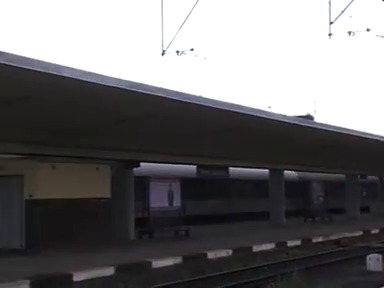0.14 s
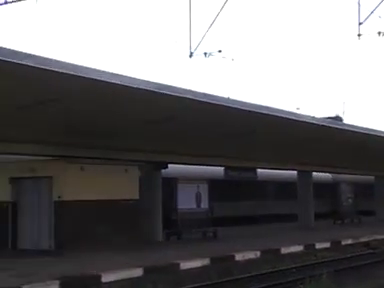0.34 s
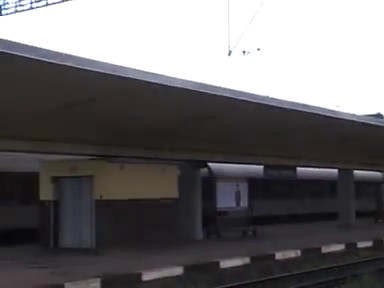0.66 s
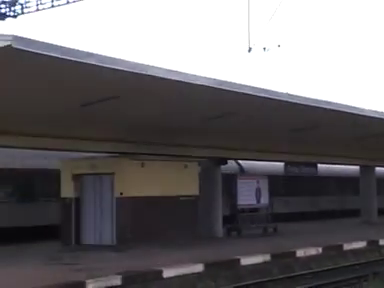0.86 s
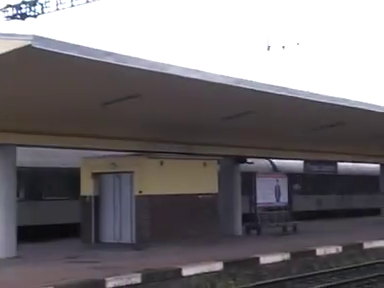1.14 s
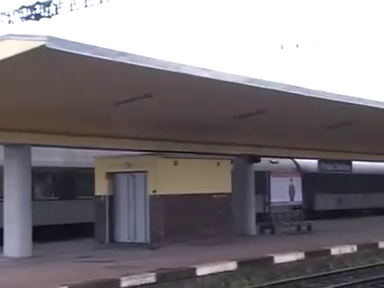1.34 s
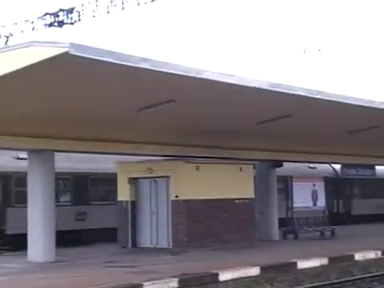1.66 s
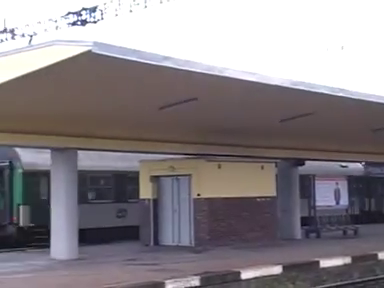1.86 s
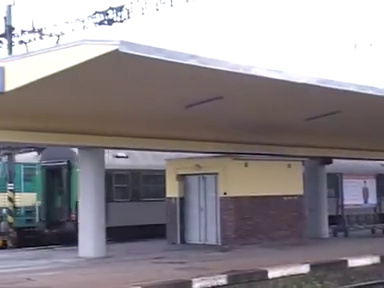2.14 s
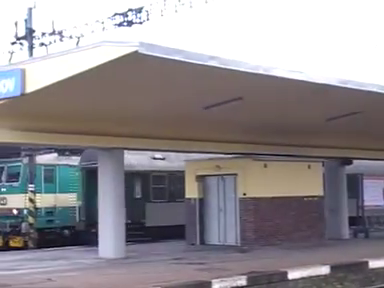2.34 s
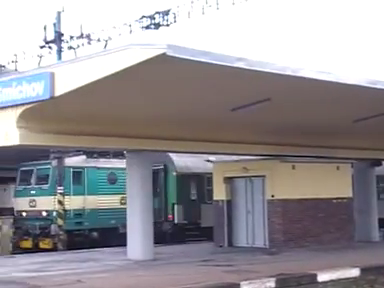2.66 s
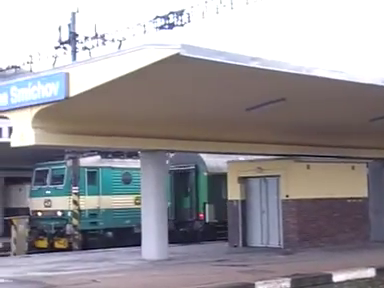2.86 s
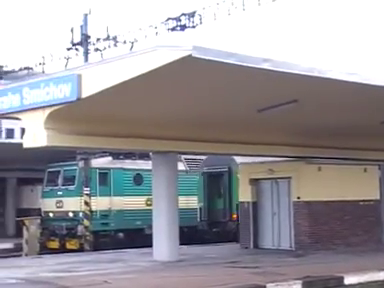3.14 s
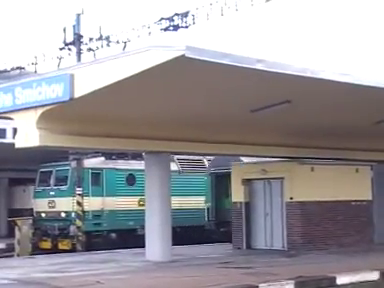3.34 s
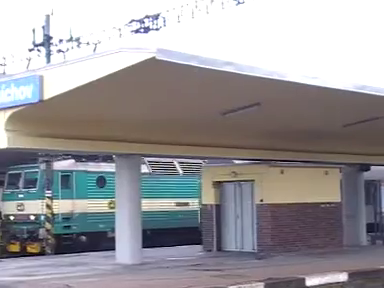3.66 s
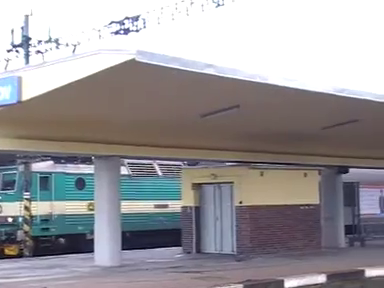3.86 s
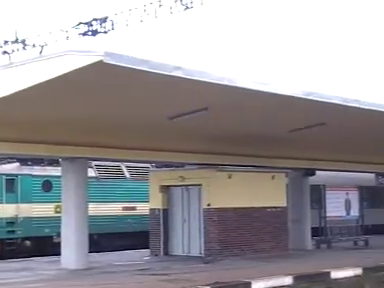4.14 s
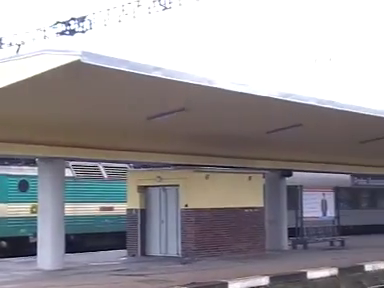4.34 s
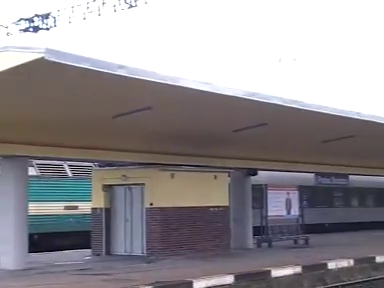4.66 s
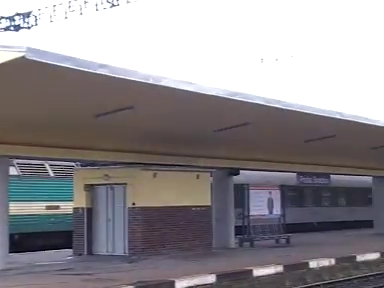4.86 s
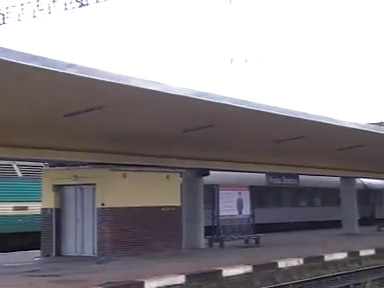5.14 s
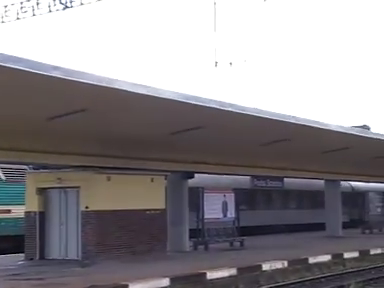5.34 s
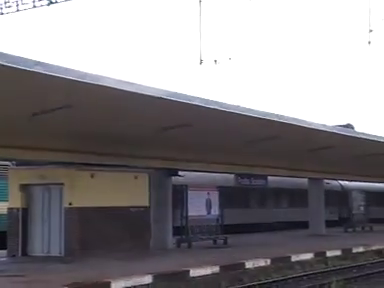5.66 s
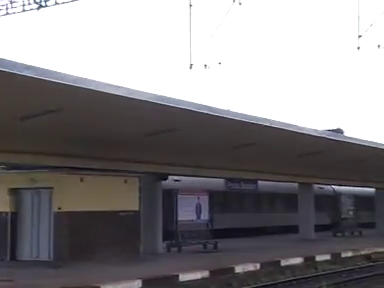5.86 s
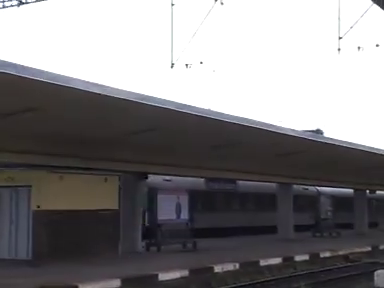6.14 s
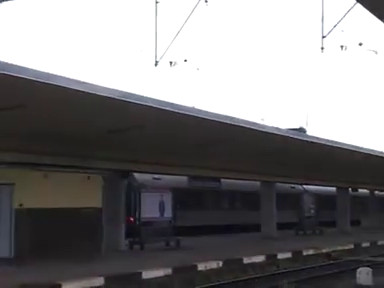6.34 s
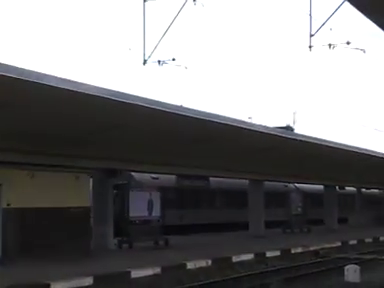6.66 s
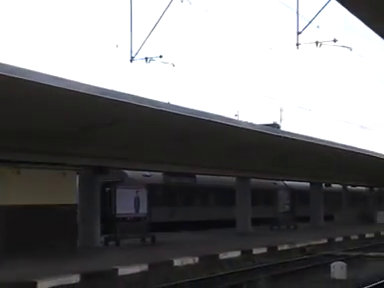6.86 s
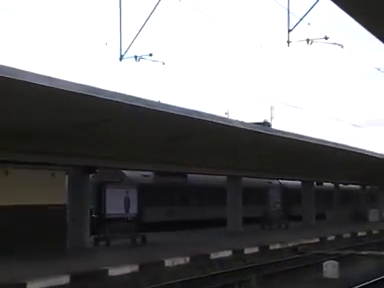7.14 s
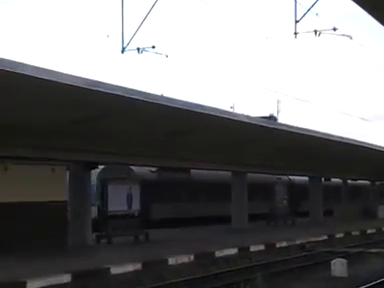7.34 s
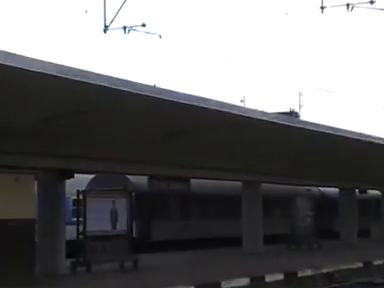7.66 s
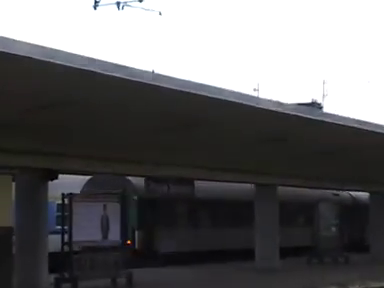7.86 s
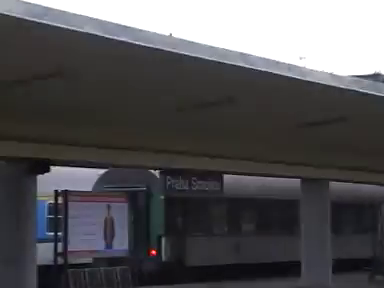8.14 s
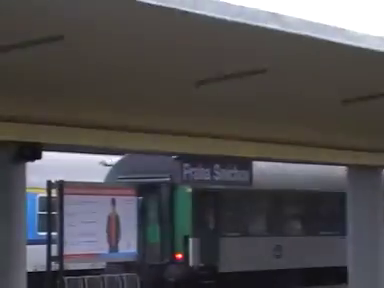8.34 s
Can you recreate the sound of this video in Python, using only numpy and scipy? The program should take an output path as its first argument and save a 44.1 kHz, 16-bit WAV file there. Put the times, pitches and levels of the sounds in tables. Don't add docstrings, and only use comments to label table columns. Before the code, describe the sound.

Brakes shriek on slowing train wheels, heard from a platform some distance away. Thin metallic whistling tones tremble, cut and return over a muffled rolling roar, while dull thuds and loose knocks come mostly in the first half. The rumble weakens, the highest squeal drops away, and two lower steady whines take over, dip together briefly and continue faintly, with hiss around them. A faint locomotive fan hum stays underneath.

```python
import sys
import numpy as np
from scipy import signal
from scipy.fft import rfft, irfft, next_fast_len
from scipy.io import wavfile
from scipy.ndimage import uniform_filter1d, minimum_filter1d

SR = 44100
rng = np.random.default_rng(int(sys.argv[2]) if len(sys.argv) > 2 else 0)


def ratio_of_db(decibels):
    return 10 ** (np.asarray(decibels, float) / 20)


def master_out(mix):
    frames = np.transpose(np.atleast_2d(mix))
    ceiling = np.clip(frames, -1, 1)
    pcm = np.round(ceiling * 32767).astype(np.int16)
    wavfile.write(sys.argv[1], SR, pcm)


N = 374403
T = np.arange(N) / SR
STEREO = np.array([[1], [-1]])


def unit(x):
    return x / np.sqrt(np.mean(np.abs(x) ** 2))


def curve(rows, col=1):
    rows = np.array(rows)
    return np.interp(T, rows[:, 0], rows[:, col])


def walk(rate_hz):
    hold = int(SR / rate_hz)
    steps = np.repeat(rng.standard_normal(N // hold + 1), hold)
    return unit(uniform_filter1d(uniform_filter1d(steps, hold), hold)[:N])


def slips(rows):
    return sum(db * np.clip(1 - np.abs(T - s) / half_s, 0, 1) for s, db, half_s in rows)


def bites(rows):
    power = 0
    for s, peak_db, rise, fall in rows:
        drop_db = np.where(T < s, rise * (s - T), fall * (T - s))
        power = power + ratio_of_db(peak_db - drop_db) ** 2
    return np.sqrt(power)


def flutter(width_hz, steep, edge_db=0.):
    hop = 8
    size = next_fast_len(N // hop + 2)
    f = np.fft.fftfreq(size, hop / SR)
    z = rng.standard_normal(size) + 1j * rng.standard_normal(size)
    z = z * (1 + (f / width_hz) ** 2) ** (-steep / 2)
    z = z * ratio_of_db(edge_db * np.clip(-f / width_hz - .4, 0, .2) * 3.1)
    return unit(signal.resample(np.fft.ifft(z), size * hop)[:N])


def band_noise(noise, low_hz, high_hz, order):
    sos = signal.butter(order, [low_hz, high_hz], "band", fs=SR, output="sos")
    return unit(signal.sosfilt(sos, noise))


# centre in Hz, width in Hz, level in dB.
FAN_HUMS = [
    (258, 2.7, -47),
    (1001, 86, -45.5),
    (646, 25, -50.5),
]


def fans():
    return sum(ratio_of_db(db) * np.real(flutter(width_hz, 2.8) * np.exp(2j * np.pi * hz * T))
               for hz, width_hz, db in FAN_HUMS)


# time in seconds, level in dB.
ROLL_LEVEL = [(0, -27), (.4, -30.5), (1.1, -34), (1.6, -33), (2.0, -37.5), (2.5, -33.5), (3.2, -33),
              (3.7, -33), (3.85, -34.5), (4.3, -36), (4.55, -41), (5.1, -36.5), (5.42, -39), (6.0, -38),
              (6.7, -34.5), (7.37, -40), (7.66, -36), (8.49, -35.5)]
# frequency in Hz, density in dB per Hz.
ROLL_SPECTRUM = [(25, -26), (50, -9), (100, 0.5), (210, -0.5), (320, -7), (420, -6), (800, -3.5),
                 (1500, -6), (2500, -8.5), (3600, -16.5), (5500, -19), (8000, -18), (10200, -18),
                 (11000, -33.5), (11500, -55)]
# frequency in Hz, side minus mid in dB.
ROLL_WIDTH = [(60, -15), (110, -24), (190, -18.5), (350, -16), (620, -16.5), (1120, -14), (2010, -13.5),
              (3610, -11), (6490, -10.5), (11600, -1.5)]
# time in seconds, change in dB.
BLOCK_DRAG = [(0, 4.5), (.95, 9), (1.2, 1.5), (2.0, -1), (4.4, -2.5), (5.45, 3.5), (6.3, 0.5), (8.49, -4)]
# time in seconds, rise in dB.
JOLTS = [(0.153, 3.5), (.6, 1.5), (.95, 3.5), (1.3, 0), (2.139, 4), (2.3, 1.5), (2.62, 4), (3.2, 1.5),
         (3.45, .5), (3.622, 3), (3.78, 2.5), (4.46, 2), (4.67, 4.5), (5.06, .3), (5.88, 4.5), (6.2, 1.5),
         (6.5, 3), (6.991, 1.5), (7.21, 3)]
# share of rolling level, of jolts, of drag, drift in dB/s.
PART_RESPONSE = [
    (1.1, 0.78, 0.041, 0.3),
    (0.97, 1.04, .02, -0.03),
    (0.87, 1.2, 0.81, -0.5),
    (0.69, 1.5, 1, 0.1),
    (0.62, 1.65, 0.47, -1.5),
]


def rolling():
    f = np.fft.rfftfreq(N, 1 / SR) + 1
    spectrum, width = np.array(ROLL_SPECTRUM), np.array(ROLL_WIDTH)
    tilt = ratio_of_db(np.interp(np.log(f), np.log(spectrum[:, 0]), spectrum[:, 1]))
    jolt_db = slips([(s, db, 0.051) for s, db in JOLTS])
    level_db = curve(ROLL_LEVEL)
    controls = np.array([level_db - level_db.mean(), jolt_db, curve(BLOCK_DRAG), T - T.mean()])
    part_db = np.array(PART_RESPONSE) @ controls
    handover = np.log([250, 600, 2000, 4000, 6500, 9000])
    parts = np.eye(5)[[0, 1, 1, 2, 3, 4]].T
    shared = walk(11)
    out = 0
    for hz in 25 * 2 ** np.arange(0, 9.1, .5):
        shape = tilt * np.cos(np.pi * np.clip(np.log2(f / hz), -.5, .5))
        mid, side = irfft(rfft(rng.standard_normal((2, N))) * shape, N)
        share = np.array([np.interp(np.log(hz), handover, part) for part in parts])
        db = share @ part_db
        db = db + (0.38 + 0.49 * share[2]) * shared + 1.0 * walk(6)
        side_db = np.interp(np.log(hz), np.log(width[:, 0]), width[:, 1]) + 1.5
        lean_db = np.interp(np.log2(hz), [7, 10, 12], [-.3, .6, .1])
        out = out + ratio_of_db(db + STEREO * lean_db) * (mid + STEREO * ratio_of_db(side_db) * side)
    return ratio_of_db(-30.5) * unit(out)


# time in seconds, thud in dB.
JOINT_THUDS = [(.15, -20), (.95, -23), (2.15, -21), (2.62, -20.5), (3.179, -24), (2.8, -25), (3.45, -30),
               (3.62, -24), (3.77, -24), (4.03, -27), (4.3, -32), (5.8, -35), (6.5, -40), (7.83, -27),
               (8.08, -30)]


def joints():
    thud = band_noise(rng.standard_normal(N), 100, 210, 3)
    out = np.zeros(N)
    for s, thud_db in JOINT_THUDS:
        age = np.maximum(T - s + 0.019, 0)
        out += ratio_of_db(thud_db) * (1 - np.exp(-age / 0.036)) * np.exp(-age / 0.037) * thud
    return out


# time in seconds, level in dB.
COUPLING_KNOCKS = [(.245, -32), (2.15, -34), (2.69, -31.5), (3.16, -30.5), (3.785, -33), (6.26, -39),
                   (6.79, -38)]


def knocks():
    hollow = band_noise(rng.standard_normal(N), 560, 900, 2)
    gain = 0
    for s, db in COUPLING_KNOCKS:
        decay_s = np.where(T < s, .008, .035)
        gain = gain + ratio_of_db(db) * (T > s - .02) * np.exp(-np.abs(T - s) / decay_s)
    return gain * hollow


# time in seconds, level in dB, centre in Hz, length in seconds.
GRIT_TICKS = [(0.928, -40, 11500, .014), (2.43, -24, 9800, .004), (2.8, -49.5, 11400, .01),
              (3.2, -36, 9800, .008), (4.1, -39, 9650, .008), (4.475, -43, 11600, .014),
              (5.7, -48, 11400, .01)]


def ticks():
    grit = rng.standard_normal((2, N))
    return sum(ratio_of_db(db) * np.exp(-((T - s) / length_s) ** 2) * band_noise(grit, hz * .97, hz * 1.03, 2)
               for s, db, hz, length_s in GRIT_TICKS)


def ring(mode, rows, steady, steep, side_db, lag, wobble_db=0., gain_db=0., edge_db=0.):
    from_s, to_s, start_hz, end_hz, width_hz = mode
    hz = np.interp(T, [from_s, to_s], [start_hz, end_hz])
    fade_in = T - from_s + (from_s <= 0)
    fade_out = to_s - T + (to_s > T[-1] - .02)
    fade = np.clip(np.minimum(fade_in, fade_out) / 0.14, 0, 1)
    steady = np.clip(steady, 0, 1)
    mid = steady + np.sqrt(1 - steady ** 2) * flutter(width_hz, steep, edge_db)
    side = ratio_of_db(side_db) * flutter(width_hz, steep, edge_db)
    phase = 2 * np.pi * np.cumsum(hz) / SR + STEREO * lag * walk(2.475)
    level = bites(rows) * ratio_of_db(gain_db + wobble_db * walk(9)) * fade
    return np.sqrt(2) * level * np.real(np.exp(1j * phase) * (mid + STEREO * side))


# from s, to s, start in Hz, end in Hz, width in Hz.
FAINT_LOW_MODES = [(5.6, 8.2, 4885, 4880, 40), (4.1, 6.4, 4550, 4570, 50), (0, 3.6, 6185, 6150, 40),
                   (5.1, 7.1, 6170, 6170, 55), (7, 8.49, 6110, 6130, 30), (.1, 1.6, 3278, 3270, 22),
                   (0, 1.2, 3822, 3812, 26), (5.1, 5.9, 3350, 3340, 35), (5.9, 7.05, 5670, 5665, 40),
                   (7.5, 8.49, 5300, 5300, 40), (6.3, 7.1, 4070, 4070, 30), (4, 4.45, 4765, 4760, 25)]
# peak in seconds, peak in dB, rise in dB/s, fall in dB/s.
FAINT_LOW_BITES = [
    [(5.85, -39, 160, 87), (6.45, -35.5, 30, 14), (7.15, -44, 8, 17)],
    [(4.3, -48, 40, 60), (4.79, -41, 72, 32.8), (5.45, -36.5, 25.3, 21.8)],
    [(.15, -35.5, 2.5, 19), (.75, -42, 45, 7.3), (1.19, -42, 10, 11), (2.95, -49, 5.3, 13)],
    [(5.85, -42, 15, 50), (6.45, -47, 3.5, 28)],
    [(7.23, -53, 59.7, 21), (7.77, -41.5, 26, 9.7)],
    [(.1, -39, 9.8, 15), (.47, -40, 100, 16), (.82, -29.5, 72, 55), (.97, -34, 39, 72), (1.22, -42, 20, 30)],
    [(0, -36, 11, 29), (.58, -39, 150, 20)],
    [(5.45, -44, 35, 32.6)],
    [(6.2, -42.5, 80, 18), (6.9, -47, 19, 60)],
    [(7.671, -44, 150, 27)],
    [(6.95, -53.5, 6, 80)],
    [(4.3, -44, 40, 90)],
]
# from s, to s, start in Hz, end in Hz, width in Hz.
FAINT_HIGH_MODES = [(0, 6.2, 8790, 8760, 50), (1.5, 4.6, 7750, 7745, 60), (5.3, 7.2, 10120, 10110, 110),
                    (.7, 3.3, 10900, 10890, 110), (7.1, 8.49, 11950, 11950, 110),
                    (5.38, 5.55, 11950, 11950, 110), (.4, 1.15, 8050, 8050, 70)]
# peak in seconds, peak in dB, rise in dB/s, fall in dB/s.
FAINT_HIGH_BITES = [
    [(.6, -50, 3, 2.7), (2.1, -34, 55, 40), (3.1, -35, 25, 40), (3.7, -36.5, 20, 15), (4.63, -38, 32, 40),
     (5.2, -39, 15, 17)],
    [(4.3, -52, 2, 12)],
    [(5.7, -44, 14, 5), (6.18, -35, 120, 12), (6.6, -37.5, 13, 11)],
    [(.91, -46, 70, 138), (1.77, -40.5, 37, 120), (2.85, -40, 62, 73)],
    [(7.6, -49.5, 2.9, 1.1)],
    [(5.46, -41.5, 225, 181)],
    [(.65, -42, 60, 5.4), (.95, -35, 25, 98)],
]


def faint_wheels():
    modes = zip(FAINT_LOW_MODES + FAINT_HIGH_MODES, FAINT_LOW_BITES + FAINT_HIGH_BITES)
    return sum(ring(mode, rows, steady=0.33, steep=1.65, side_db=-8.5, lag=0.098, wobble_db=1.5)
               for mode, rows in modes)


# from s, to s, start in Hz, end in Hz, width in Hz.
HALO_MODES = [(4.3, 8.49, 8080, 8115, 93), (5, 8.49, 7085, 7095, 75), (0, 3.35, 4790, 4815, 88),
              (3.15, 5.4, 4875, 4900, 70)]
# peak in seconds, peak in dB, rise in dB/s, fall in dB/s.
HALO_BITES = [
    [(4.45, -48, 100, 60), (4.9, -42.5, 65, 60), (5.3, -41, 15, 1.5), (6.34, -25.5, 27, 22),
     (6.81, -25.5, 36, 6.6), (7.7, -26.5, 12, 14)],
    [(5.0, -49, 11, 34), (6.27, -38, 21, 18), (7.0, -38, 28, 5), (7.67, -28, 17, 6.2)],
    [(.55, -25, 1.5, 32), (.95, -26, 23, 29), (1.49, -36.5, 9.7, 51), (2.63, -38.5, 26, 39),
     (2.88, -41.5, 60, 48), (3.15, -41.5, 12, 18)],
    [(3.35, -40.5, 40, 27), (3.58, -39, 30, 130), (4.66, -46, 60, 10), (5.05, -46, 20, 40)],
]
HALO_GAINS = [4.7, 4.4, 3.5, 1.4]


def halo_wheels():
    return [ring(mode, rows, steady=0, steep=1.91, side_db=-9.0, lag=0.17, wobble_db=2.5,
                 gain_db=db, edge_db=-1.5)
            for mode, rows, db in zip(HALO_MODES, HALO_BITES, HALO_GAINS)]


# from s, to s, start in Hz, end in Hz, width in Hz.
LOCKED_MODES = [(4.7, 8.49, 8044, 8067, 5), (5.8, 8.45, 8200, 8220, 8.9), (4.4, 8.49, 7044, 7053, 7.7),
                (5.7, 8.49, 7140, 7142, 10), (0, 1.9, 4752, 4765, 12)]
# peak in seconds, peak in dB, rise in dB/s, fall in dB/s.
LOCKED_BITES = [
    [(5.45, -31, 105, 98), (6.28, -22, 11, 30), (7.04, -9.5, 24, 14.5), (7.86, -8, 402, 174)],
    [(6.35, -39, 22, 3), (8.01, -30, 24, 8)],
    [(4.67, -53.5, 6, 8), (5.11, -46, 100, 102), (5.35, -49, 41, 7), (5.85, -37, 17, 28),
     (6.25, -30.5, 96, 6), (7.27, -19.5, 57, 11), (7.86, -21, 13.5, 32), (8.49, -36, 15, 11)],
    [(6.75, -55, 150, 48), (7.88, -41, 25, 9)],
    [(0, -33.5, 11, 71), (.35, -21, 37, 32), (.72, -23, 19, 122), (.97, -20.5, 145, 147),
     (1.39, -32, 41, 187), (1.59, -40, 73, 55)],
]


def locked_wheels():
    return [ring(mode, rows, steady=0.92, steep=1.45, side_db=-18, lag=0.17, wobble_db=1.8)
            for mode, rows in zip(LOCKED_MODES, LOCKED_BITES)]


# time in seconds, change in dB, half length in seconds.
FIRST_WHEEL_SLIPS = [(4.72, -15, 0.088), (4.87, -8, 0.059), (5.19, -14, 0.068), (5.37, -10, .07),
                     (5.51, -27, 0.032), (7.79, -22, 0.13)]
# time in
# seconds, change in dB, half length in seconds.
BEATS_8K = [(5.615, -2, 0.045), (5.847, -3, 0.027), (5.911, 6, 0.03), (6.062, -2, 0.14),
            (6.302, 3, 0.063), (6.439, -1, 0.051), (6.607, 2, 0.027), (6.667, -4, 0.045),
            (6.846, 2.5, 0.14), (7.178, -2, 0.14), (7.417, -2.5, 0.053), (7.527, 5, 0.03),
            (7.577, -1, 0.027), (8.05, -2.5, 0.12), (8.295, 5.9, 0.046), (8.401, 4, 0.03)]
# time in seconds, change in dB, half length in seconds.
BEATS_7K = [(6.194, 5.1, 0.044), (6.324, 4, 0.027), (6.872, -10.1, 0.03), (6.972, -6, 0.034),
            (7.136, -2, 0.066), (7.521, 5, 0.039), (7.693, -1, 0.18), (7.856, 4, 0.033),
            (7.996, -8, 0.04), (8.217, -3, 0.11)]
# time in seconds, change in dB, half length in seconds.
BEATS_5K = [(0.0, 4.5, 0.11), (0.21, 5, 0.08), (0.345, 5, 0.03), (0.423, -4, 0.05), (0.605, 6.5, 0.039),
            (0.607, -3, 0.15), (0.842, -3, 0.15), (1.018, -4.4, 0.03), (1.211, -2.5, 0.19),
            (1.503, 1, 0.17), (1.78, -3, 0.045), (1.924, 2, 0.03)]
# time in seconds, change in dB, half length in
# seconds.
ALL_LOWER_STEPS = [(6.38, -3, 0.043), (6.87, 2.5, 0.033), (6.9, -7, 0.014), (7.17, -3, 0.06),
                   (7.22, 2.5, 0.03)]


def lower_squeal():
    rings, halos = locked_wheels(), halo_wheels()
    first = rings[0] * ratio_of_db(slips(FIRST_WHEEL_SLIPS))
    upper = (first + rings[1] + halos[0]) * ratio_of_db(slips(BEATS_8K))
    middle = (rings[2] + rings[3] + halos[1]) * ratio_of_db(slips(BEATS_7K))
    low = (rings[4] + halos[2]) * ratio_of_db(slips(BEATS_5K)) + halos[3]
    lean_db = STEREO * -.2
    return (upper + middle + low + faint_wheels()) * ratio_of_db(slips(ALL_LOWER_STEPS) + lean_db)


# from s, to s, start in Hz, end in Hz, width in Hz.
MAIN_MODES = [(0, 5.3, 9182, 9148, 12.4), (.3, 4.7, 9218, 9186, 11), (3.2, 7.2, 9108, 9122, 4),
              (6.7, 8.49, 9013, 9025, 17), (0, 7.1, 9222, 9160, 128), (6.8, 8.49, 9080, 9075, 120)]
# peak in seconds, peak in dB, rise in dB/s, fall in dB/s.
MAIN_BITES = [
    [(0, -15, 5, 30), (.9, -15.5, 5.5, 4.2), (1.7, -15.5, 4.6, 17), (2.36, -17, 32, 2.3)],
    [(.62, -17, 80, 25), (1.22, -7, 50, 64), (2.3, -23, 30, 24), (3.1, -18, 30, 20), (3.75, -19, 30, 34),
     (4.3, -26.5, 30, 28)],
    [(3.6, -26.5, 24, 10), (4.3, -24.5, 15, 10), (5.13, -18.5, 27, 80), (5.53, -14.5, 30, 47),
     (5.99, -21, 38, 21), (6.7, -22.5, 12, 41)],
    [(7.23, -37, 13, 53), (7.84, -31, 14, 2.3), (8.32, -24, 130, 190)],
    [(.25, -13, 120, 28), (1.44, -18.5, 5.4, 18), (2.65, -17.5, 17, 3.7), (4.9, -30, 2.6, 6),
     (5.91, -28.5, 4, 13)],
    [(7.2, -42, 4, 5), (8.2, -37, 4, 4.4)],
]
# time in seconds, summed level in dB.
MAIN_GRIP = [(0, -16.5), (.45, -16.5), (1.0, -12), (1.3, -13.5), (2.4, -12), (3.2, -12), (4.4, -13),
             (5.1, -12), (5.6, -11.5), (5.8, -15), (6.5, -15), (6.9, -23), (7.33, -31), (7.67, -20.5),
             (8.49, -19)]
# time in seconds, change in dB, half length in seconds.
MAIN_SLIPS = [(.47, 6.5, 0.034), (.62, -1.5, 0.34), (.94, -7.5, 0.088), (1.08, -4, 0.056),
              (1.35, -7, 0.029), (1.57, -4.5, 0.03), (1.66, -8, 0.025), (1.89, -6, 0.072), (2.08, -5, 0.1),
              (2.21, -8, 0.06), (2.35, -6.5, 0.016), (2.56, -3.5, 0.13), (2.69, -6.5, 0.02),
              (2.79, -6, 0.068), (2.94, -11.5, 0.021), (3.12, -5, 0.073), (3.25, -8, 0.021),
              (3.53, -8, 0.021), (3.76, -2.5, .06), (3.8, 13, 0.016), (3.83, -4, 0.046), (3.91, -2, 0.1),
              (4.5, -3.5, 0.17), (4.74, -12, 0.03), (4.82, -11.5, 0.034), (4.99, -3.5, 0.071),
              (5.34, -2.5, 0.18), (6.38, -5.5, 0.075), (7.23, 9.5, 0.023), (7.92, -2, 0.054)]
# time in seconds, change in dB, half length in seconds.
MAIN_BEATS = [(0.186, 1.5, 0.023), (0.265, 3, 0.012), (0.463, 0, 0.011), (0.664, 10, 0.0095),
              (0.702, -5, 0.032), (0.806, 5.5, 0.014), (0.902, -8.8, 0.017), (0.93, 7, 0.011),
              (1.002, 9, 0.013), (1.062, -6.9, 0.012), (1.101, 5.5, 0.011), (1.145, -10, 0.016),
              (1.255, 5, 0.011), (1.698, 8.0, 0.012), (1.726, -4, 0.022), (1.758, 6, 0.018),
              (1.824, -8.9, 0.012), (1.844, 7.9, 0.012), (1.952, -5, 0.016), (2.007, 3, 0.011),
              (2.127, -3, 0.015), (2.171, 8.0, 0.012), (2.293, -4, 0.01), (2.403, 5.5, 0.012),
              (2.444, -8.0, 0.014), (2.638, 9.5, 0.012), (2.68, -9, 0.012), (2.812, 8.0, 0.012),
              (2.995, 4, 0.026), (3.035, -9, 0.018), (3.145, 9, 0.012), (3.231, -8, 0.015),
              (3.38, -9, 0.012), (3.502, -5.7, 0.018), (3.566, -6, 0.011), (3.726, -6.5, 0.012),
              (3.738, 2.5, 0.06), (3.859, 5.5, 0.026), (3.893, -9, 0.018), (4.141, -4, 0.029),
              (4.214, 7, 0.018), (4.236, -3, 0.06), (4.302, 6, 0.012), (4.35, 7, 0.024), (4.386, -5, 0.01),
              (4.478, 4, 0.018), (4.667, -3, 0.012), (4.691, 6.5, 0.014), (5.128, 6, 0.021),
              (5.48, 6.5, 0.011), (5.565, -6, 0.02), (5.763, -8.1, 0.024), (5.789, 7.5, 0.011),
              (5.869, -10, 0.012), (5.94, 5, 0.013), (6.154, 6.2, 0.011), (6.21, -14, 0.012),
              (6.356, 11, 0.012), (6.679, 6.1, 0.03), (6.767, 4.9, 0.06)]


def main_squeal():
    wheels = sum(ring(mode, rows, steady=0.7, steep=1.97, side_db=-11, lag=0.4)
                 for mode, rows in zip(MAIN_MODES[:-2], MAIN_BITES))
    wheels = wheels + sum(ring(mode, rows, steady=0, steep=2.65, side_db=-8.5, lag=0.36, gain_db=2.8)
                          for mode, rows in zip(MAIN_MODES[-2:], MAIN_BITES[-2:]))
    span = int(0.078 * SR)
    power = uniform_filter1d(uniform_filter1d(wheels.mean(axis=0) ** 2, span), span)
    grip_db = curve(MAIN_GRIP) + slips(MAIN_SLIPS) + 0.76 * slips(MAIN_BEATS)
    return wheels / np.sqrt(power + 1e-9) * ratio_of_db(grip_db)


# time in seconds, left minus right in dB.
MAIN_PAN = [(0.0, 1.5), (0.52, 3), (1.82, 4), (4.3, 0), (4.47, 4), (5.13, 0), (6.29, -1), (6.43, 2.5),
            (7.12, -1), (8.49, 0.5)]


def squeal():
    pan_db = STEREO * (curve(MAIN_PAN) + 0.67) / 2
    return lower_squeal() + main_squeal() * ratio_of_db(pan_db)


def scene():
    return fans() + rolling() + joints() + knocks() + ticks() + squeal()


def band_limit(x):
    return signal.sosfilt(signal.butter(12, 12250, fs=SR, output="sos"), x)


def record(dry):
    span = int(.004 * SR)
    headroom = np.minimum(.86 / (np.abs(dry).max(axis=0) + 1e-9), 1)
    held = minimum_filter1d(headroom, 2 * span)
    gain = uniform_filter1d(uniform_filter1d(held, span), span)
    return band_limit(dry * gain)


dry = scene()
out = record(dry)
master_out(out)
```